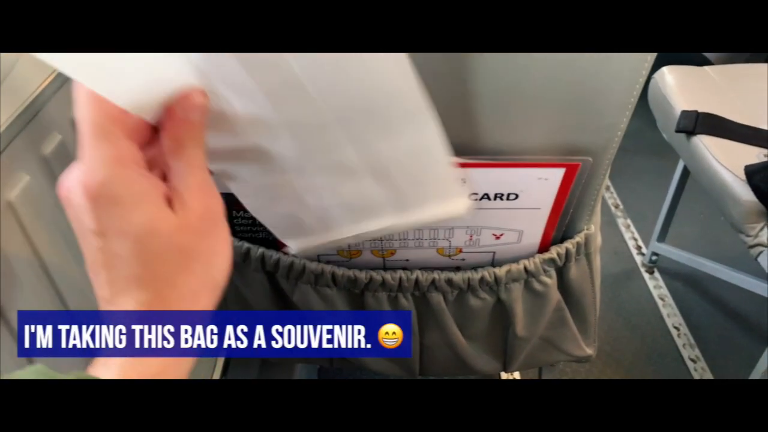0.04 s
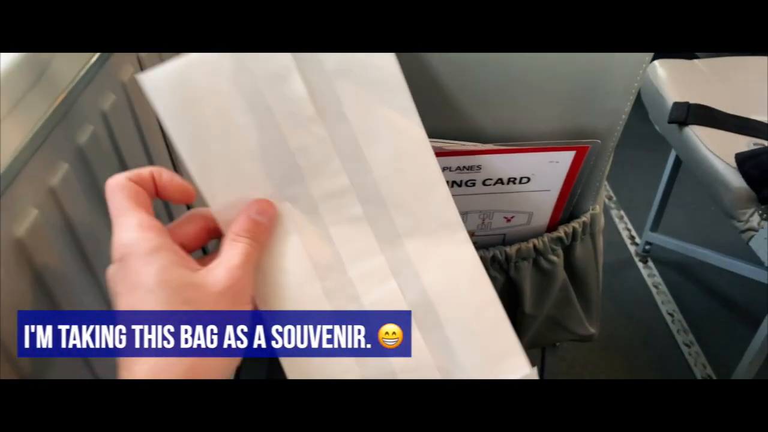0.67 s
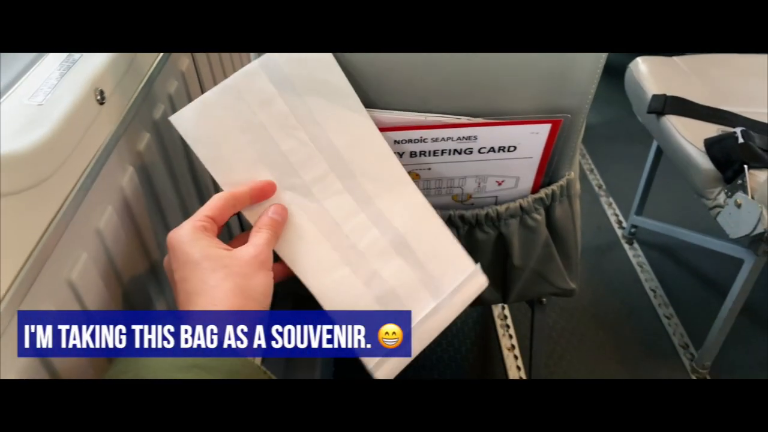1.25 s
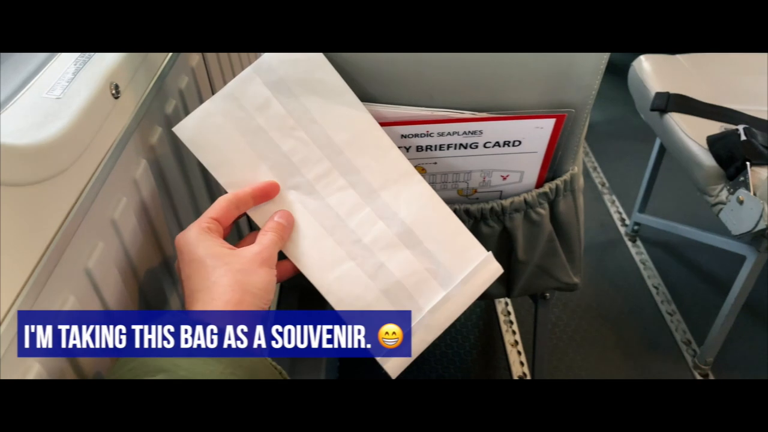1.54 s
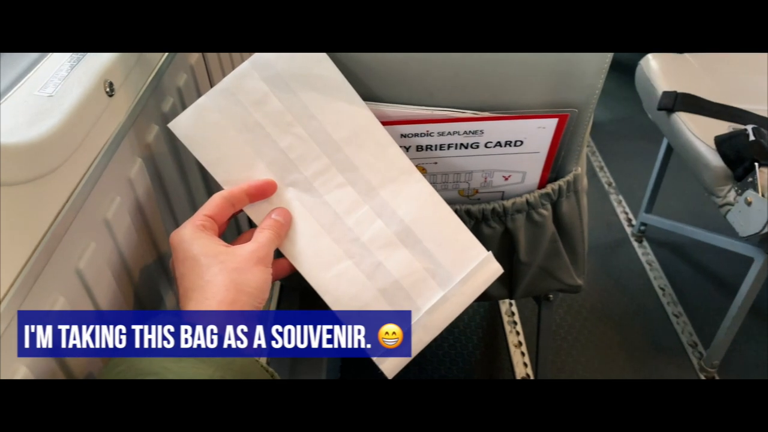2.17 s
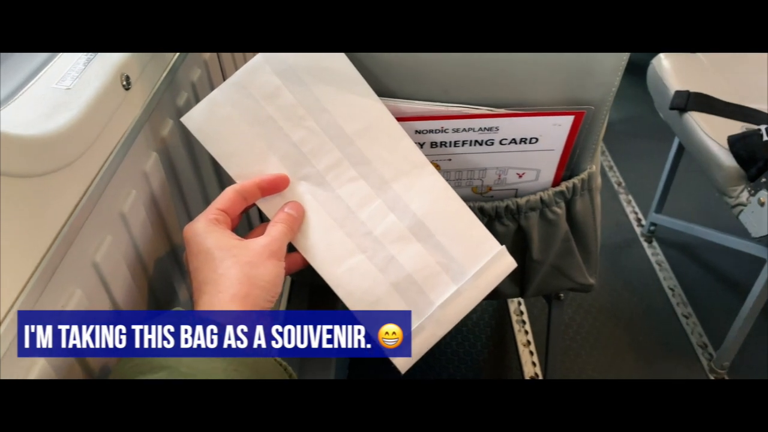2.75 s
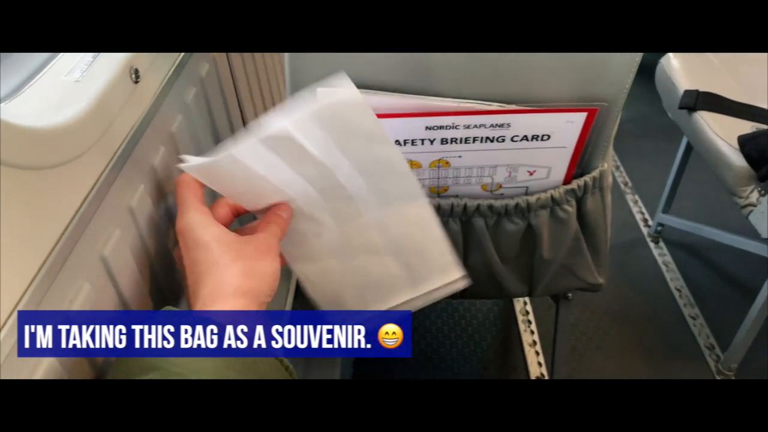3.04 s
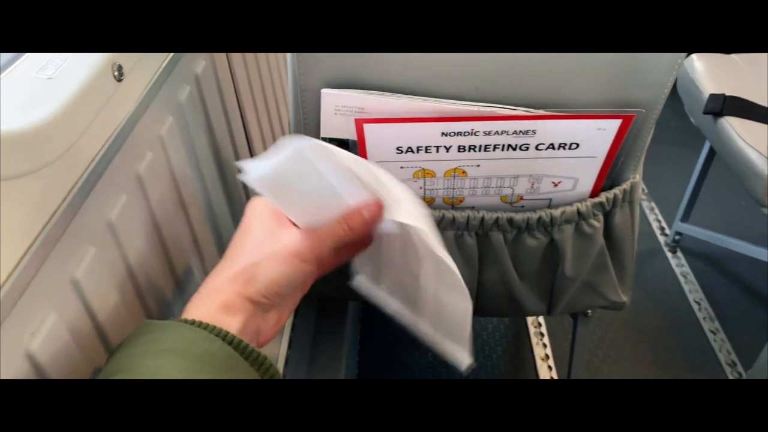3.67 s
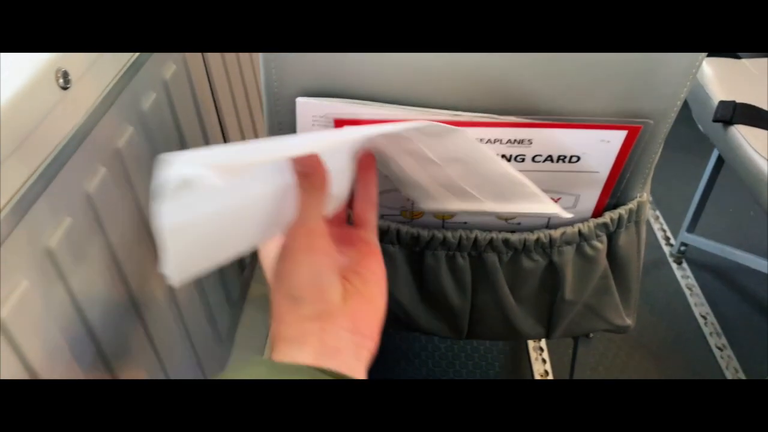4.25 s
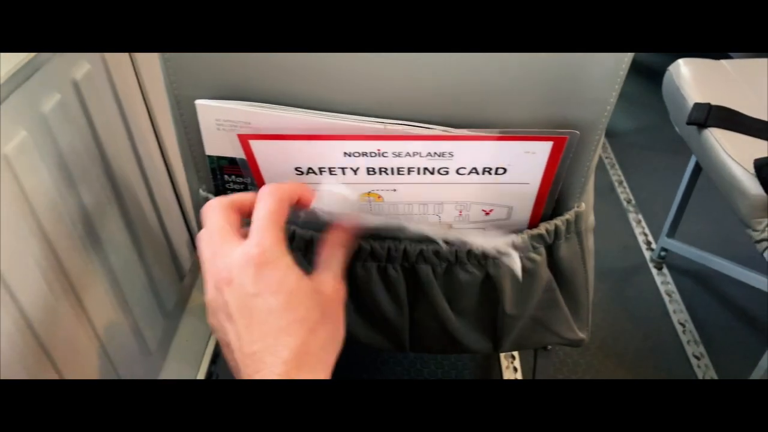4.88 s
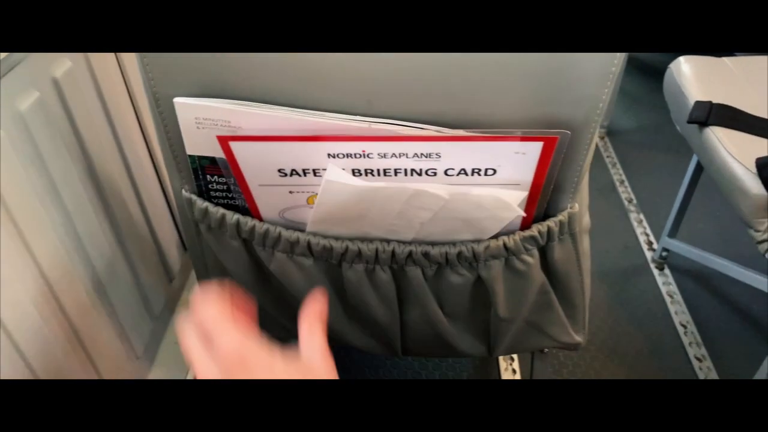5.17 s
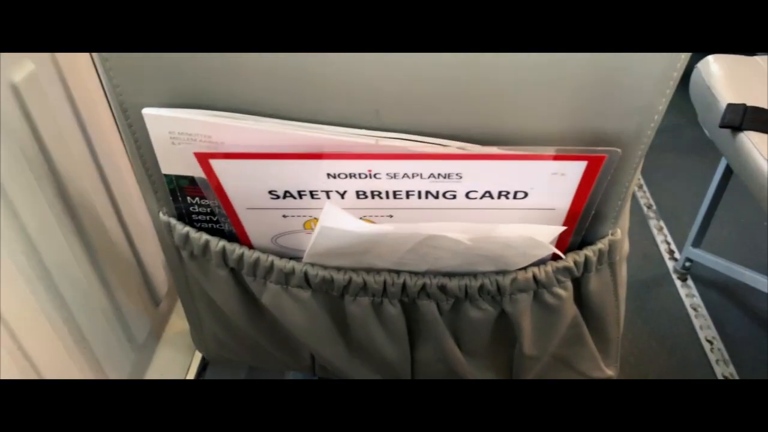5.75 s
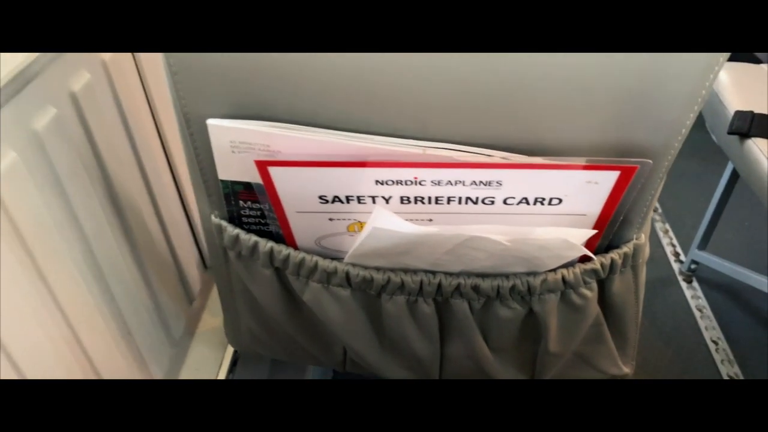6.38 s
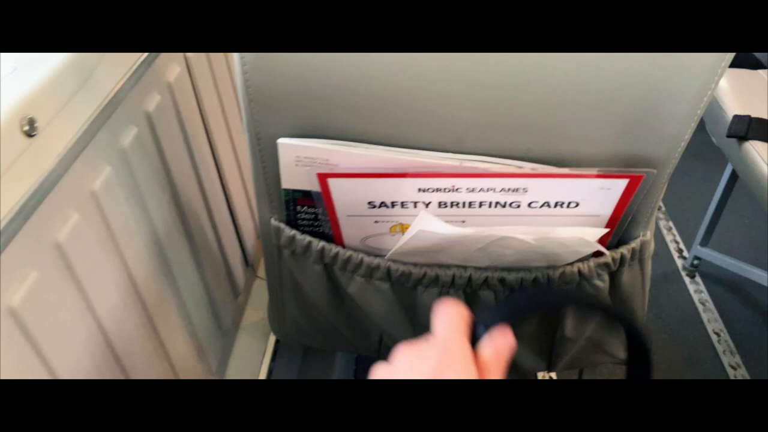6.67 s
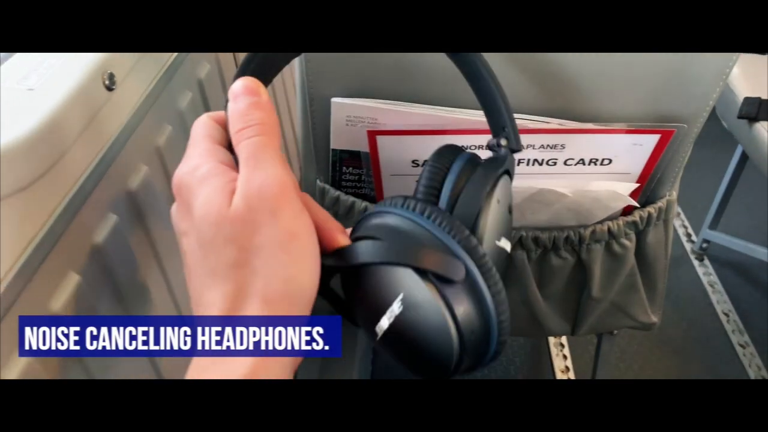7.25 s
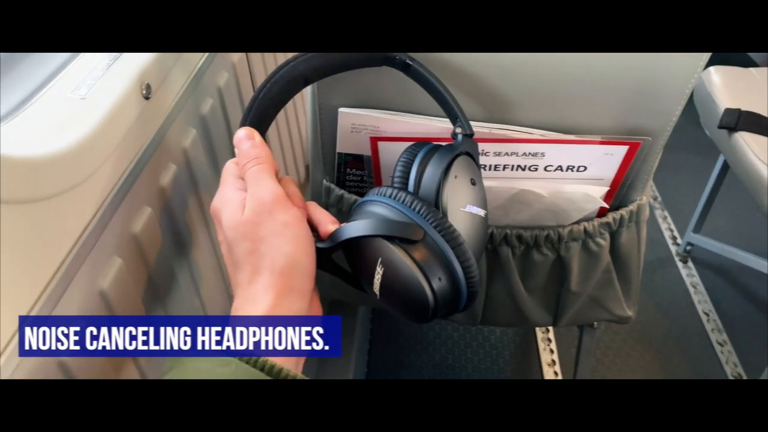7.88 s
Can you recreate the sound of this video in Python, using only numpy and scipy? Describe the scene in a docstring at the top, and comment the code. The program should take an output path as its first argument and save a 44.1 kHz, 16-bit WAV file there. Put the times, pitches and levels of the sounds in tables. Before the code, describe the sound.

Steady low propeller drone and rushing air inside a small plane's cabin, with a faint high whine and soft paper rustling.

```python
"""Small twin turboprop, by a window seat.

Propeller blades beat on the fuselage and fill the cabin with standing waves, so the drone changes colour
as a hand-held phone drifts through them. The slipstream roars on the skin, air hisses from the right,
a vent sings now and then, turbines and gearbox whine faintly, and a paper bag rubs softly into a seat
pocket. Drone and airflow sink a few dB as time goes on."""
import sys
import numpy as np
from scipy import signal
from scipy.fft import rfft, irfft
from scipy.io import wavfile
from scipy.ndimage import uniform_filter1d

SR = 44100
rng = np.random.default_rng(int(sys.argv[2]) if len(sys.argv) > 2 else 0)


def output_pcm(signal):
    """Save a mono or channel-first signal as 16-bit PCM at the path in sys.argv[1].

    Samples are clipped to [-1, 1] before scaling.
    """
    pcm = np.clip(np.atleast_2d(signal).T, -1, 1) * 32767
    wavfile.write(sys.argv[1], SR, np.round(pcm).astype(np.int16))


N = 357651
TIME = np.arange(N) / SR
FREQS = np.maximum(np.arange(N // 2 + 1) * SR / N, 1)


def undb(db):
    """Decibels to gain."""
    return 10 ** (np.asarray(db) / 20)


def curves(table):
    """One envelope per column, from rows that begin with a time in seconds."""
    seconds, *columns = np.transpose(table)
    return [np.interp(TIME, seconds, column) for column in columns]


def shape(points):
    """Points of frequency and value, joined on a log-frequency axis."""
    hz, value = np.transpose(points)
    return np.interp(np.log(FREQS), np.log(hz), value)


def bell(hz, width_hz, steepness=2):
    """A spectral peak of height 1, width_hz wide at half height."""
    return 1 / (1 + (2 * (FREQS - hz) / width_hz) ** steepness)


def bump(at_s, width_s):
    """A smooth rise to 1 and back."""
    return np.exp(-((TIME - at_s) / width_s) ** 2)


def sink(db_per_s, hold_s=0):
    """A level in dB that holds at 0, then falls steadily."""
    return -db_per_s * np.maximum(TIME - hold_s, 0)


def white():
    """Spectrum of fresh white noise at 0 dB per Hz."""
    return rfft(rng.standard_normal(N)) * np.sqrt(SR / 2)


def wander(rate):
    """Smooth random motion, rate steps a second, with a spread near 1."""
    hold = int(SR / rate)
    steps = np.repeat(rng.standard_normal(N // hold + 2), hold)
    return np.sqrt(2) * uniform_filter1d(uniform_filter1d(steps, hold), hold)[:N]


def turn(hz):
    """Running phase of a frequency curve."""
    return 2 * np.pi * np.cumsum(hz) / SR


def tone(phase, db, pan_db=0, lead=0):
    """A stereo sine at an rms level; the left side leads by lead radians."""
    left = undb(db + pan_db / 2) * np.sin(phase + lead / 2)
    right = undb(db - pan_db / 2) * np.sin(phase - lead / 2)
    return np.sqrt(2) * np.array([left, right])


def scattered(phase, db, rate):
    """A tone arriving by many reflections: level and phase drift separately on each side."""
    sides = [wander(rate) * np.sin(phase) + wander(rate) * np.cos(phase) for _ in range(2)]
    return undb(db) * np.array(sides)


def from_right(spectrum, lag_ms=.143):
    """Stereo sound of a source on the right, which reaches the left a little later."""
    delay = np.exp(-2j * np.pi * FREQS * lag_ms / 1000)
    return irfft(np.array([spectrum * delay, spectrum]), N)


def standing_wave(lean, back_db, near_db):
    """Level in dB at the phone: pressure changes evenly between the two ends of its path."""
    return 20 * np.log10((1 - lean) * undb(back_db) + lean * undb(near_db))


def gearbox(mesh_hz=2370):
    """A faint tone of meshing teeth, scattered round the cabin."""
    # Each row: time in seconds, level in dB.
    levels = [(0, -71), (.7, -70), (1.1, -66.5), (3.4, -65.5), (3.8, -71), (8.11, -72)]
    level_db, = curves(levels)
    return scattered(turn(mesh_hz + 3 * wander(3)), level_db, rate=5)


def vent(ring_hz=3025, width_hz=150):
    """Air rings a narrow resonance in a vent: a breathy whistle that comes and goes."""
    # Each row: peak time in seconds, width in seconds, gain in dB.
    swells = [(.2, .3, -5), (.72, .2, 0), (2.4, .25, -7), (3.3, .2, -3), (5.4, .3, -6.5), (6.75, .25, -2)]
    breath = sum(undb(db) * bump(at_s, width_s) for at_s, width_s, db in swells)
    ring = undb(-76.5) * bell(ring_hz, width_hz)
    return irfft(np.array([white(), white()]) * ring, N) * breath


def paper_rub():
    """Paper and cloth slide in quick, tiny catches; each rustle swells and fades with the push."""
    # The rustle's colour. Each row: frequency in Hz, base level in dB per Hz.
    colour = [(800, -105), (1500, -84.5), (2250, -81.5), (2700, -89), (3300, -88), (3900, -94),
              (4600, -90.5), (5400, -100), (10000, -120)]
    # The bag slides into the pocket, then a hand fetches headphones.
    # Each row: peak time in seconds, width in seconds, gain in dB.
    rustles = [(4.42, .5, .5), (6.35, .3, -4.5), (7.2, .22, -5)]
    friction = irfft(np.array([white(), white()]) * undb(shape(colour)), N)
    catches = undb(2.5 * wander(120))
    push = sum(undb(db) * bump(at_s, width_s) for at_s, width_s, db in rustles)
    return friction * push * catches


def turbines(blade_phase, waver_hz=3.7, flicker_db=3, skirt_width_hz=400):
    """Each compressor sings a wavering tone in a noise skirt, with sidebands one blade rate away."""
    # Each row: pitch in Hz, base level in dB, lower and upper sideband in dB relative to it.
    compressors = [(9309, -60.5, -4.3, -11), (9403, -65.7, -12, 1.6)]
    # The whole whine rises and falls. Each row: time in seconds, gain in dB.
    ride = [(0, 2), (.5, -1), (1.1, 4), (1.5, 2.5), (3.4, 2), (3.9, 0.5), (4.9, 2), (5.6, -1), (6.8, -0.5),
            (8.11, -3.5)]
    # The louder turbine's centre tone flares and dips.
    # Each row: peak time in seconds, width in seconds, gain in dB.
    flares = [(1, .12, 2.5), (3.35, .17, 8.5), (3.9, .2, -6), (4.25, .08, 4), (5.2, .5, -3),
              (6.6, .25, 2.5), (7.4, .12, 3)]
    gain_db, = curves(ride)
    flare_db = sum(db * bump(at_s, width_s) for at_s, width_s, db in flares)
    whine = 0
    for (hz, db, lower_db, upper_db), own_db in zip(compressors, (flare_db, 0)):
        for offset, share_db in ((0, own_db), (-blade_phase, lower_db), (blade_phase, upper_db)):
            phase = turn(hz + waver_hz * wander(20)) + offset
            level = undb(db + share_db + flicker_db * wander(16))
            whine = whine + np.sqrt(2) * level * np.sin(phase)
    centre_hz = np.mean([hz for hz, *_ in compressors])
    skirt = white() * undb(-81.5) * bell(centre_hz, skirt_width_hz)
    return from_right(rfft(whine) + skirt) * undb(gain_db)


def air_hiss():
    """A thin, slightly flickering jet of air, heard directly from the right."""
    # Each row: frequency in Hz, base level in dB per Hz.
    colour = [(5000, -106), (6500, -93), (7500, -89.7), (8600, -87.4), (10500, -89.9), (12200, -88.8),
              (13200, -92.4), (15500, -94.7)]
    jet = white() * undb(shape(colour))
    return from_right(jet) * undb(0.31 * wander(20))


def cabin_modes(spacing_hz=12):
    """Countless small cabin modes put fine peaks and dips on the spectrum, most in the mids."""
    ripple = np.interp(FREQS / spacing_hz, np.arange(4096), rng.standard_normal(4096))
    depth_db = 1.3 * shape([(250, 0), (500, 1), (2500, 1), (7000, .6)])
    return undb(depth_db * ripple)


def slipstream(lean, churn_db=1.0, eddy_db=.35, swell_db=.5):
    """Turbulence shakes the skin: long waves reach both sides alike, short ones come from all round."""
    # The roar's colour. Each row: frequency in Hz, base level in dB per Hz.
    colour = [(18, -76), (38, -60.5), (72, -51.5), (110, -51), (220, -55.3), (350, -58.3), (500, -68.5),
              (850, -71.8), (1400, -74), (2100, -77.2), (2600, -79.6), (4500, -83), (6200, -88.3),
              (7500, -96), (10000, -118)]
    # Resonances and nulls of cabin and panels. Each row: centre in Hz, width in Hz, lift in dB.
    panels = [(126, 14, -3.5), (141, 10, 2.5), (156, 14, -1.5), (218, 16, 2.3), (690, 110, 2),
              (830, 50, -1), (1010, 80, .8), (1160, 120, 2.6), (1340, 80, -1), (2200, 90, 2.2),
              (3050, 200, 1.3), (4300, 400, .6), (5050, 500, -1)]
    # Stereo image. Each row: frequency in Hz, coherence from 0 to 1, left lead in radians.
    image = [(50, .96, 0), (170, .95, .1), (220, .56, .3), (320, .36, 0), (620, .25, .4), (800, .26, -1),
             (1150, .25, -.8), (1400, .3, -2), (2300, .25, -2.1), (3400, .1, -3), (6000, .1, -2.7)]
    # The window wall is on the left. Each row: frequency in Hz, left minus right in dB.
    wall_side = [(40, .4), (120, 1.8), (215, 4.5), (270, 1.8), (380, 2.4), (600, 1.6), (750, 3),
                 (1050, 2.7), (1250, 1.4), (1900, 1.7), (3000, 1), (4400, 0), (6000, -1.6), (9000, 0)]
    # Pockets of roar between seat and wall. Each row: centre in Hz, width in Hz,
    # then lifts in dB: held back, leaning in, and extra at the top of the swell.
    pockets = [(288, 65, -1.5, 0, 1), (380, 130, 1.9, -3, 2), (523, 180, 0, 2.2, 1),
               (1080, 410, 2, 1.4, -0.8)]
    colour_db = shape(colour) + sum(db * bell(hz, width) for hz, width, db in panels)
    coherence = shape([(hz, share) for hz, share, _ in image])
    lead = shape([(hz, radians) for hz, _, radians in image])
    mid = white() * np.sqrt((1 + coherence) / 2)
    side = white() * np.sqrt((1 - coherence) / 2)
    wall_db = shape(wall_side) / 2
    left = (mid + side) * undb(wall_db) * cabin_modes()
    right = (mid - side) * undb(-wall_db) * cabin_modes()
    spectra = np.array([left * np.exp(1j * lead), right]) * undb(colour_db)
    roar = irfft(spectra, N)
    swell = bump(at_s=5.85, width_s=1.4)  # one gentle swell, strongest in the low pockets
    for hz, width, back_db, near_db, extra_db in pockets:
        band = irfft(spectra * bell(hz, width, steepness=4), N)
        lift_db = standing_wave(lean, back_db, near_db) + extra_db * swell + churn_db * wander(10)
        roar = roar + band * (undb(lift_db) - 1)
    return roar * undb(eddy_db * wander(18) + swell_db * swell)


def drone_levels(lean):
    """Standing waves set the levels in dB of blade harmonics 1 to 4; the lowest two also fade."""
    # Harmonics 1 and 2. Each row: base level in dB held back, then leaning in.
    long_waves = [(-18.5, -18.6), (-26.6, -24.9)]
    # They sink in soft steps. Each row: time in seconds, gain in dB.
    fade = [(0, -.2), (1.5, -.2), (4.3, -2), (5, -4.4), (5.8, -4), (7, -5), (7.6, -7.1), (8.11, -7.1)]
    # Harmonics 3 and 4 trade places as the phone moves.
    # Each row: time in seconds, level of the third in dB, level of the fourth in dB.
    short_waves = [(0, -38, -49), (.4, -38.5, -47), (1.1, -47, -42), (1.7, -45, -38.8), (2.7, -47, -41),
                   (3.25, -46, -39.5), (3.6, -42, -44), (4, -37.5, -44), (4.7, -37.2, -45.5),
                   (5.8, -35.8, -55), (6.7, -37.3, -58), (7.5, -40.5, -58), (8.11, -40, -56)]
    fade_db, = curves(fade)
    first, second = [standing_wave(lean, back_db, near_db) + fade_db for back_db, near_db in long_waves]
    return [first, second + sink(db_per_s=4.5, hold_s=7), *curves(short_waves)]


def propellers(blade_phase, lean, flow_db, flutter_db=0.38):
    """Each blade pass is a saw-like pressure wave; the cabin gives each harmonic its own level."""
    # The drone sits a little left. Each row: time in seconds, left minus right in dB.
    pan = [(0, 3.2), (1.2, 2.5), (5, 2.6), (7.2, 0), (8.11, 1)]
    # Harmonics 1 to 4. Each row: extra left minus right in dB, left lead in radians.
    placement = [(0, -0.31), (0.4, 0.18), (-3, -0.059), (3, -0.52)]
    # Faint upper harmonics from all round. Each row: harmonic number, base level in dB.
    overtones = [(5, -57), (6, -62), (7, -59), (8, -65)]
    # They stand out where the phone crosses a loud spot. Each row: harmonic number,
    # peak time in seconds, width in seconds, level in dB, left minus right in dB.
    loud_spots = [(5, 2.2, 2.6, -52, 11), (6, .6, .3, -51, -4), (6, 4.9, 1.7, -55, 7),
                  (7, .1, .6, -49.5, 4), (7, 3.2, .6, -54.5, 1), (7, 5.7, .7, -56, 6)]
    pan_db, = curves(pan)
    drone = 0
    for k, (db, (extra_db, lead)) in enumerate(zip(drone_levels(lean), placement), 1):
        shake_db = flutter_db * (k - 1) * wander(12)  # uneven air shakes the higher harmonics
        drone = drone - (-1) ** k * tone(k * blade_phase, db + shake_db, pan_db + extra_db, lead)
    for k, db in overtones:
        drone = drone + scattered(k * blade_phase, db + flow_db, rate=4)
    for k, at_s, width_s, db, side_db in loud_spots:
        phase = k * blade_phase + .6 * wander(10)
        drone = drone + tone(phase, db + 2 * wander(8), side_db) * bump(at_s, width_s)
    return drone


def scene():
    """Drone, airflow and small cabin sounds; the phone's lean colours both drone and roar."""
    # The governor holds the propellers nearly steady. Each row: time in seconds, blade rate in Hz.
    blade_rate = [(0, 83.7), (.8, 83.6), (3, 83.67), (5, 83.86), (6.2, 84.03), (7.1, 83.54), (8.11, 83.75)]
    # The phone's drift. Each row: time in seconds, lean from 0 (held back) to 1 (by the seat in front).
    drift = [(0, .75), (.8, .5), (1.4, .03), (3.2, .08), (3.7, .5), (4.9, .5), (5.9, .95), (6.6, .88),
             (8.11, .85)]
    blade_hz, = curves(blade_rate)
    lean, = curves(drift)
    blade_phase = turn(blade_hz)
    flow_db = 2 + sink(db_per_s=0.66)
    airflow = (slipstream(lean) + air_hiss()) * undb(flow_db)
    drone = propellers(blade_phase, lean, flow_db)
    return drone + airflow + turbines(blade_phase) + gearbox() + vent() + paper_rub()


def record(dry):
    """The phone cuts the top treble steeply."""
    top_hz = 15700
    return signal.sosfilt(signal.ellip(10, .1, 80, top_hz, fs=SR, output="sos"), dry)


dry = scene()
out = record(dry)
output_pcm(out)
```